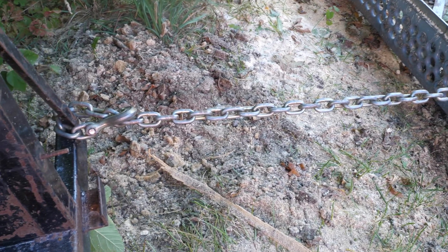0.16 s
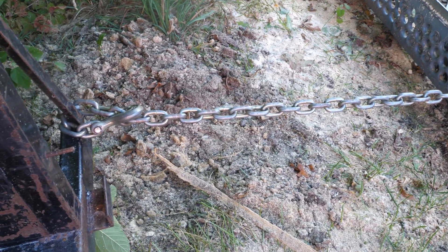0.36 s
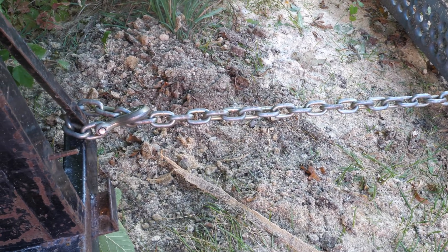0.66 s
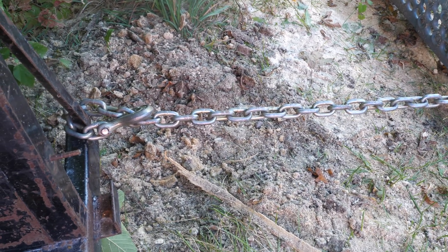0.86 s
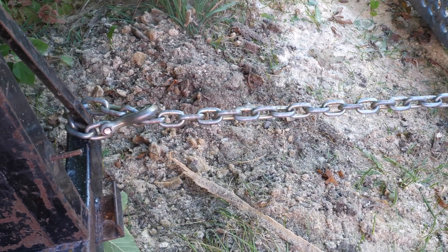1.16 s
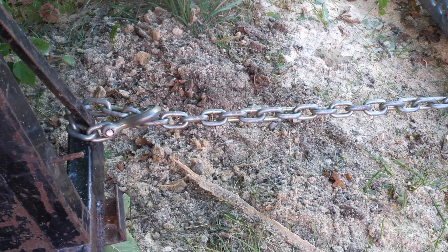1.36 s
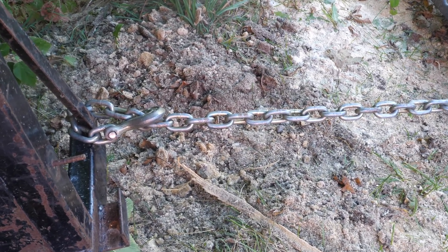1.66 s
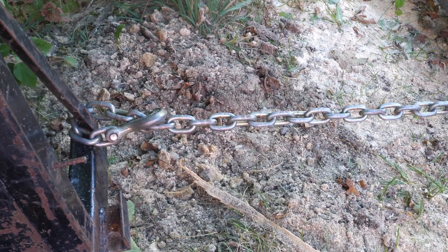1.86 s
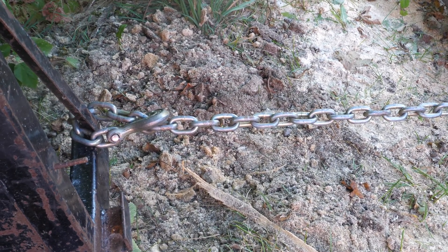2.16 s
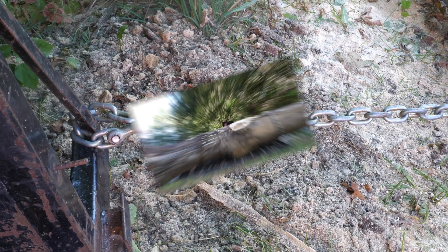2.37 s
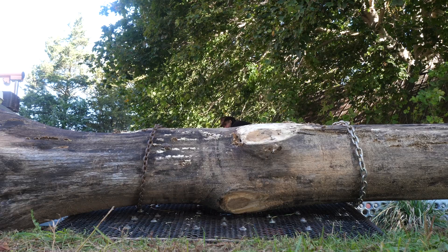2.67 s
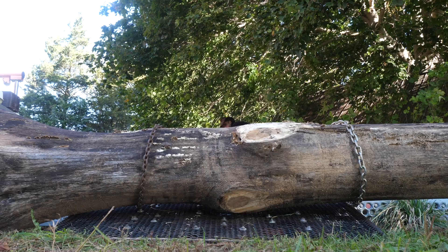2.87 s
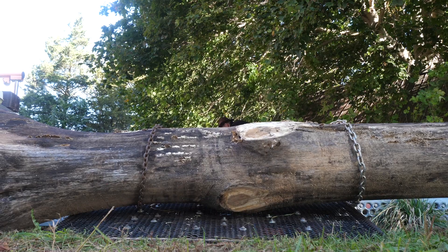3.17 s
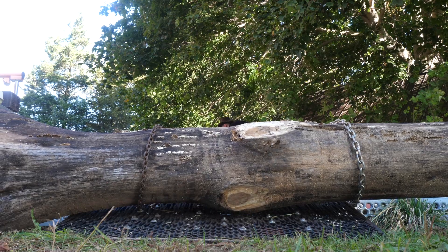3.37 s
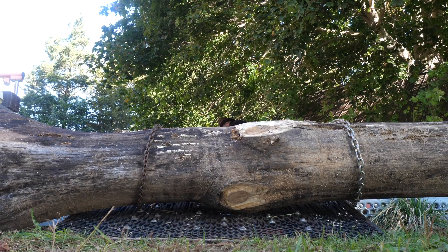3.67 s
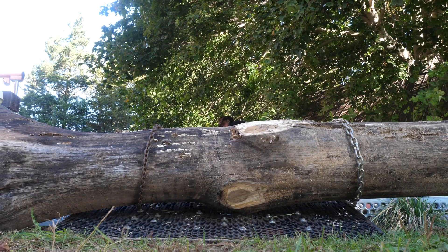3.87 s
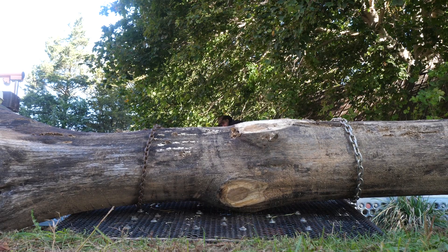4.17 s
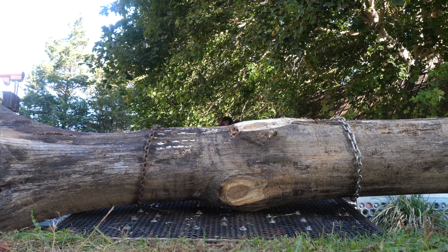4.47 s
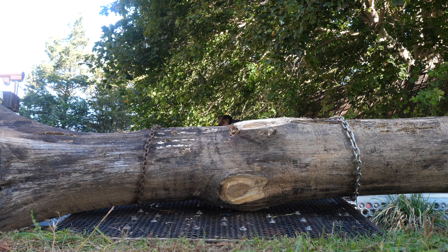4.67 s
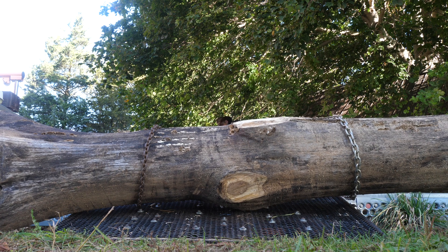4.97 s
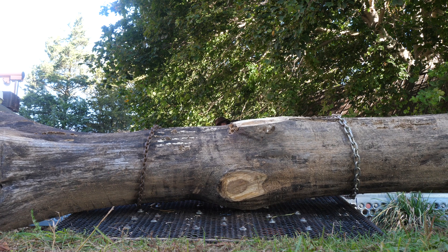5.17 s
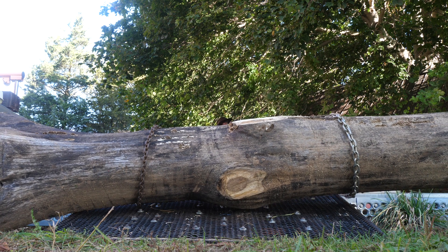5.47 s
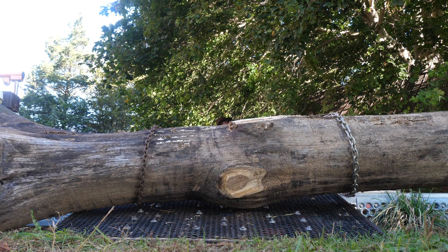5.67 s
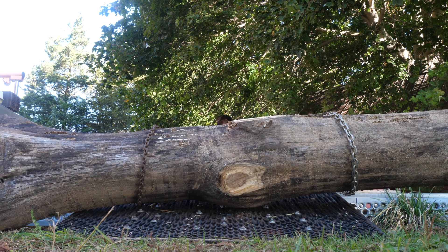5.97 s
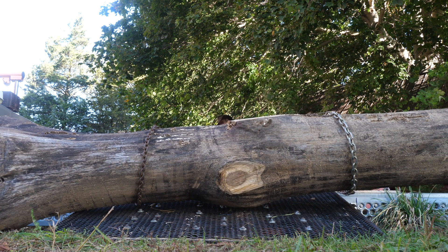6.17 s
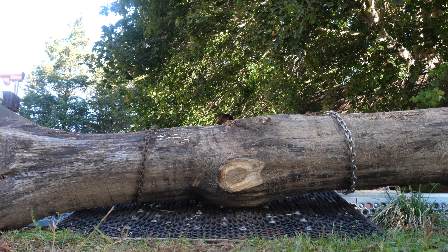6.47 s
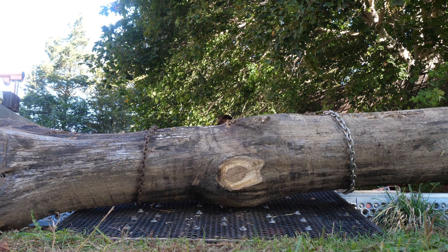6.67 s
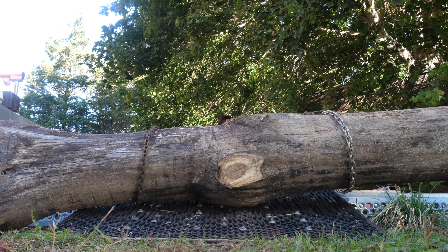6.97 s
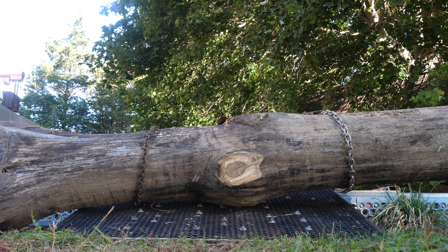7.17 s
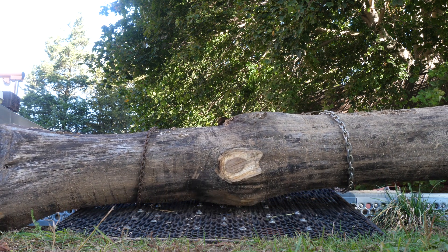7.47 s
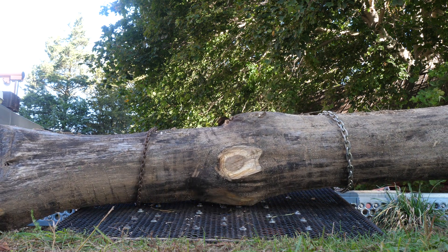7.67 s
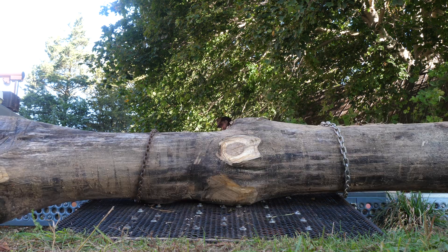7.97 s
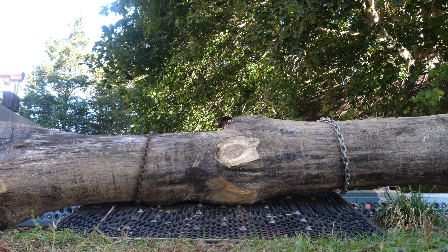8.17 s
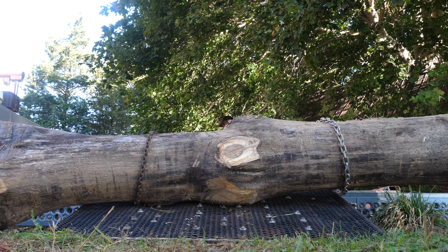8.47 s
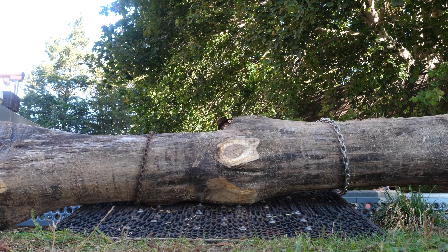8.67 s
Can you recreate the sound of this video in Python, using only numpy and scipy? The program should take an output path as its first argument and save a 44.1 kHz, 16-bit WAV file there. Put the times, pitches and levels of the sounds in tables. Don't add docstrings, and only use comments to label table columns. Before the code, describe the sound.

Soft leaf hiss and distant traffic are cut off by a loud, steady winch rattle, with a heavy log rumbling and thudding underneath until the end.

```python
import sys
import numpy as np
from scipy import signal
from scipy.io import wavfile
from scipy.ndimage import uniform_filter1d

SR = 44100
rng = np.random.default_rng(int(sys.argv[2]) if len(sys.argv) > 2 else 0)


def persist_wave(psi):
    counts = np.round(np.clip(psi, -1, 1) * 32767).astype(np.int16)
    wavfile.write(sys.argv[1], SR, np.atleast_2d(counts).T)


def boost_factor(decibels):
    exponent = np.asarray(decibels, float) / 20
    return 10 ** exponent


N = 388962
T = np.arange(N) / SR

# time in seconds, cable load in dB, log drag in dB.
LOAD = [(2.4, -17, -4), (2.45, -3.5, 1), (2.6, -0.3, -0.5), (2.93, 1.1, 0.5), (3.33, -0.8, -0.7),
        (4.1, 0.6, 1), (4.36, 1.2, 1), (4.43, -5, -2), (4.51, 1.1, 1.3), (5.05, -2.2, -2.5), (5.29, 1, 0),
        (5.53, 0.2, 0), (5.74, 0.3, -0.8), (6.46, -0.2, 0.5), (7.16, 0.14, 1.4), (7.58, 0.6, 0.6),
        (8.21, 0.2, 4), (8.82, 0.2, 3)]
# time in seconds, angle in turns.
CARRIER_TURNS = [(2.45, 0), (3.63, 7.29), (4.23, 11.21), (5.12, 16.63), (7.22, 29.97), (7.82, 34.06),
                 (8.82, 40.2)]
# time in seconds, peak in dB.
HARD_SLAPS = [(2.4319, -23), (2.4608, -25), (2.6279, -22), (2.7147, -24), (2.7611, -21), (2.8873, -24),
              (3.2011, -24), (3.4141, -23), (3.5783, -22), (3.7404, -19), (3.8397, -22), (3.9484, -23),
              (4.3545, -24), (4.4747, -23), (4.5156, -20), (4.8309, -23), (4.9995, -21), (5.0948, -24),
              (5.2754, -23), (5.7339, -24), (6.116, -24), (6.346, -24), (6.4872, -23), (6.5934, -22),
              (6.8558, -24), (7.0609, -24), (7.3677, -21), (7.4829, -25), (7.7338, -25), (8.5674, -25)]
# time in seconds, peak in dB.
FADE_IN_SLAPS = [
    (2.401, -58),
    (2.417, -50),
    (2.424, -43),
]
# typical delay in seconds, relative size.
BOUNCES = [
    (0, .45),
    (.0008, .9),
    (.0018, 1),
    (.003, .55),
]
# frequency in Hz, width in Hz, level in dB.
HOUSING = [(1004, 71, -11), (1152, 11, -4.5), (1410, 44, -2.5), (1600, 205, -7), (1775, 153, -10.5),
           (1954, 140, -9.5), (2448, 165, -4.5), (2675, 78, -3), (2944, 200, -8.5), (3104, 280, -9),
           (3530, 400, -12), (4036, 160, -6), (4303, 76, -11.5), (4954, 120, -7), (5065, 75, -6.5),
           (5540, 125, -15), (6110, 490, -19.5), (7220, 105, -17), (7870, 300, -14), (8056, 260, -12),
           (8315, 225, -11), (9270, 410, -18.5), (10940, 670, -22.5), (11000, 1600, -22), (12700, 800, -43),
           (13960, 400, -19), (13860, 97, -10), (15000, 290, -42), (15550, 300, -38)]
# frequency in Hz, width in Hz, level in dB.
FRAME_MODES = [(271.7, 37.6, -1), (400, 94, -1), (532, 67, -9), (641, 91, 0.5), (786, 136, -2.5),
               (951, 33, -3)]
# start in seconds, peak in dB, mode in Hz, T60 in seconds, deep share in dB.
THUDS = [(2.431, -41.5, 694, 0.091, -33), (3.088, -36.5, 414, 0.06, -31), (3.118, -39, 491, 0.063, -11),
         (3.872, -49.5, 489, 0.32, -35), (4.171, -40.5, 492, 0.08, -24), (4.195, -43, 650, 0.083, -28),
         (4.251, -37.5, 507, 0.066, -19), (5.554, -35, 407, 0.043, -5), (5.629, -36.5, 507, 0.02, -6),
         (6.49, -39, 525, 0.077, -28), (7.953, -35.5, 655, 0.035, -21), (8.061, -35, 656, 0.043, -26),
         (8.295, -37, 720, 0.04, -11)]
# start in seconds, low mode in Hz, high mode in Hz, level in dB, crack in dB.
KNOCKS = [
    (1.596, 348, 859, -45.5, -68),
    (2.1662, 400, 1300, -49, -60),
    (2.17, 760, 1700, -52.5, -62),
    (2.286, 900, 1810, -61, -64.5),
]
# start in seconds, low mode in dB, high mode in dB.
TICKS = [(.018, -56.5, -65.5), (.047, -62, -53.5), (.085, -55, -66), (.115, -64, -66), (.385, -62, -68),
         (.552, -54, -60), (1.019, -57, -70), (1.05, -55, -63.5)]
# time in seconds, frequency in Hz, level in dB.
CHIRP = [(0, 1135, -69), (.008, 1300, -71), (.016, 1484, -63.5), (.026, 1300, -64), (.033, 1098, -64),
         (.038, 1050, -78)]
# start in seconds, gain in dB.
CALLS = [
    (1.105, 6.5),
    (1.432, 2),
]
# frequency in Hz, density in dB per Hz.
YARD_SPECTRUM = [(24, -73), (40, -36), (123, -2), (179, -12.5), (218, -12), (350, -16), (484, -14),
                 (591, -17.5), (758, -13.5), (1770, -25), (2270, -27), (5300, -30), (7300, -23.5),
                 (15500, -38.5)]
# time in seconds, gain in dB.
YARD_FADE = [(0, 3), (2.2, 3), (2.3, 0), (2.39, -4), (2.45, -7), (8.82, 1.5)]

SLAP_COUNT, GAP_S, EXTRA_GAP_S = 520, .007, .0085
SLAP_DB, SCATTER_DB, WOBBLE_DB = -26, 1.19, 0.67
HARD_DB, HUSH_S, RECOVER_S = -1.2, .018, .008
WHIR_DB, WHIR_PER_LOAD, WHIR_WOBBLE_DB, BUZZ_S = -42, 1.55, 2.5, .0034
STRAIN_FROM_S, STRAIN_DB_PER_S, BRIGHTEN_DB_PER_S = 5, -0.95, .55
FRAME_DB, GROUND_DB, GROUND_PER_DRAG, GROUND_FLICKER_DB = -54, -73.5, 2, 4.5
YARD_DB = -69.5


def level(x, db):
    return x * boost_factor(db) / np.sqrt(np.mean(x ** 2))


def ring(x, hz, width_hz):
    return signal.lfilter(*signal.iirpeak(hz, hz / width_hz, fs=SR), x)


def puffs(s, size, fade_s):
    index = np.clip(np.asarray(s) * SR, 0, N - 1).astype(int)
    kicks = np.bincount(index, size, N)
    return signal.lfilter([1], [1, -np.exp(-1 / (fade_s * SR))], kicks)


def walk(rate_hz):
    k = int(SR / rate_hz)
    held = np.repeat(rng.standard_normal(N // k + 1), k)
    return 1.3 * uniform_filter1d(uniform_filter1d(held, k), k)[:N]


def tone(s, hz, t60_s, db):
    age_s = np.clip(T - s, 0, None)
    envelope = (1 - np.exp(-age_s / 0.00056)) * np.exp(-np.log(1000) * age_s / t60_s)
    return boost_factor(db) * envelope * np.sin(2 * np.pi * hz * age_s)


def wobble(s):
    return np.cos(2 * np.pi * np.interp(s, *np.transpose(CARRIER_TURNS)))


def slaps(load_db):
    hard_s, hard_db = np.transpose(HARD_SLAPS)
    first_s, first_db = np.transpose(FADE_IN_SLAPS)
    chance = rng.exponential(size=(SLAP_COUNT, 4))
    extra = np.minimum(chance[:, :2].mean(axis=1), 2)
    s = hard_s[0] + np.cumsum(GAP_S + EXTRA_GAP_S * extra)
    scatter = np.minimum(chance[:, 2:].sum(axis=1), 5)
    db = SLAP_DB - SCATTER_DB * scatter + WOBBLE_DB * wobble(s) + np.interp(s, T, load_db)
    after_s = s[:, None] - hard_s
    hushed = ((after_s > -HUSH_S) & (after_s < RECOVER_S)).any(axis=1)
    clear = ~hushed & (s < N / SR - .01)
    return np.r_[hard_s, first_s, s[clear]], np.r_[hard_db + HARD_DB, first_db, db[clear]]


def whir(s, peak_db, whir_db):
    touch_s = rng.uniform(0, N / SR, size=2600)
    chatter = puffs(touch_s, boost_factor(1.6 * rng.exponential(size=2600)), 0.0017)
    brushes = boost_factor(-8 + 3.6 * walk(80))
    buzz_db = peak_db - 4.5 + 2.2 * wobble(s) + 2.4 * rng.standard_normal(len(s))
    buzz = uniform_filter1d(puffs(s, boost_factor(buzz_db), BUZZ_S), size=170)
    return boost_factor(whir_db) * (level(chatter, -2.0) + brushes) + buzz


def gears(s, peak_db, whir_db):
    share = boost_factor(5.5 * rng.standard_normal((len(s), len(HOUSING))))
    weight = np.array([boost_factor(2 * db) * width_hz for hz, width_hz, db in HOUSING])
    share = share / np.sqrt(share ** 2 @ weight / weight.sum())[:, None]
    delay_s, size = np.transpose(BOUNCES)
    bounces = (len(s), len(delay_s))
    land = ((s[:, None] + delay_s * rng.uniform(.6, 1.4, size=bounces)) * SR).astype(int)
    whir_size = whir(s, peak_db, whir_db)
    strain_s = np.maximum(T - STRAIN_FROM_S, 0)
    out = 0
    for k, (hz, width_hz, db) in enumerate(HOUSING):
        push = (boost_factor(peak_db) * share[:, k])[:, None] * size * rng.choice([-1, 1], size=bounces)
        slap = np.bincount(land.ravel(), push.ravel(), N) * min(hz / 2000, 1) ** 2
        hiss = boost_factor(8.0 - 0.5 * hz / 10000) * whir_size * rng.standard_normal(N)
        drift = STRAIN_DB_PER_S * (2600 < hz < 3700) + BRIGHTEN_DB_PER_S * (3900 < hz < 5200)
        out = out + boost_factor(db + drift * strain_s) * ring(boost_factor(25) * slap + hiss, hz, width_hz)
    return signal.sosfilt(signal.butter(2, 900, "high", fs=SR, output="sos"), out)


def frame(s, peak_db, frame_db):
    shake = level(puffs(s, boost_factor(peak_db), 0.012), -4) + boost_factor(-6 + 4.8 * walk(45))
    body = 0
    for hz, width_hz, db in FRAME_MODES:
        body = body + boost_factor(db) * ring(shake * rng.standard_normal(N), hz, width_hz)
    return boost_factor(frame_db) * level(body, 0)


def ground_rumble(ground_db):
    deep = boost_factor(GROUND_FLICKER_DB * walk(16)) * rng.standard_normal(N)
    ground = ring(ring(deep, 72, 62), 58, 60) + boost_factor(-1.5) * ring(deep, 136, 67)
    return boost_factor(ground_db) * level(ground, 2.4)


def log_thuds():
    s, db = np.transpose(THUDS)[:2]
    out = ring(puffs(s - .01, boost_factor(db + 6.5), 0.027) * rng.standard_normal(N), 460, 610)
    for s, db, hz, t60_s, deep_db in THUDS:
        out = out + tone(s, hz, t60_s, db) + tone(s + 0.0045, 147, 0.079, db + deep_db)
    return out


def knocks():
    s, _, _, _, crack_db = np.transpose(KNOCKS)
    out = ring(puffs(s, boost_factor(crack_db + 3), .003) * rng.standard_normal(N), 1300, 3400)
    for s, low_hz, high_hz, db, _ in KNOCKS:
        out = out + tone(s, low_hz, 0.026, db) + tone(s, high_hz, 0.023, db)
    return out


def ticks():
    return sum(tone(s, 596, 0.026, low_db) + tone(s, 2360, 0.026, high_db) for s, low_db, high_db in TICKS)


def bird():
    s, hz, db = np.transpose(CHIRP)
    out = 0
    for at_s, call_db in CALLS:
        phase = 2 * np.pi * np.cumsum(np.interp(T - at_s, s, hz)) / SR
        size = boost_factor(call_db + np.interp(T - at_s, s, db, -200, -200))
        out = out + size * (np.sin(phase) + boost_factor(-6.5) * np.sin(phase + 2 * np.pi * 980 * T))
        hang = np.interp(T - at_s, [.03, .045, .11, .125, .16], [0, 1, 0.83, 0.56, 0.034])
        whistle = np.sin(2 * np.pi * np.cumsum(2390 + 18 * walk(90)) / SR)
        out = out + boost_factor(-75) * hang * whistle * boost_factor(3 + 3.8 * walk(70))
    return out


def far_bird():
    gate = np.interp(T, [1.52, 1.55, 1.66, 1.69], [0, 1, 1, 0])
    return boost_factor(-81) * gate * level(ring(rng.standard_normal(N), 6400, 60), 0)


def yard():
    out, swell = 0, walk(1.53)
    hz, db = np.transpose(YARD_SPECTRUM)
    for centre_hz in 63 * 2 ** (np.arange(24.5) / 3):
        width_hz = centre_hz / 3
        band = ring(ring(rng.standard_normal(N), centre_hz, width_hz), centre_hz, width_hz)
        band_db = np.interp(np.log(centre_hz), np.log(hz), db)
        out = out + boost_factor(band_db + .5 * swell + walk(5.3)) * band
    return level(out, YARD_DB) * boost_factor(np.interp(T, *np.transpose(YARD_FADE)))


def scene():
    s, load_db, drag_db = np.transpose(LOAD)
    load_db, drag_db = np.interp(T, s, load_db), np.interp(T, s, drag_db)
    slap_s, peak_db = slaps(load_db)
    winch = gears(slap_s, peak_db, WHIR_DB + WHIR_PER_LOAD * load_db + WHIR_WOBBLE_DB * wobble(T))
    winch = winch + frame(slap_s, peak_db, FRAME_DB + drag_db)
    log = ground_rumble(GROUND_DB + GROUND_PER_DRAG * drag_db) + log_thuds()
    background = knocks() + ticks() + bird() + far_bird() + yard()
    return ((T > s[0]) * (winch + log) + background)[None]


def roll_off(x):
    return signal.sosfilt(signal.butter(12, 16640, fs=SR, output="sos"), x)


def record(dry):
    return roll_off(dry)


dry = scene()
out = record(dry)
persist_wave(out)
```